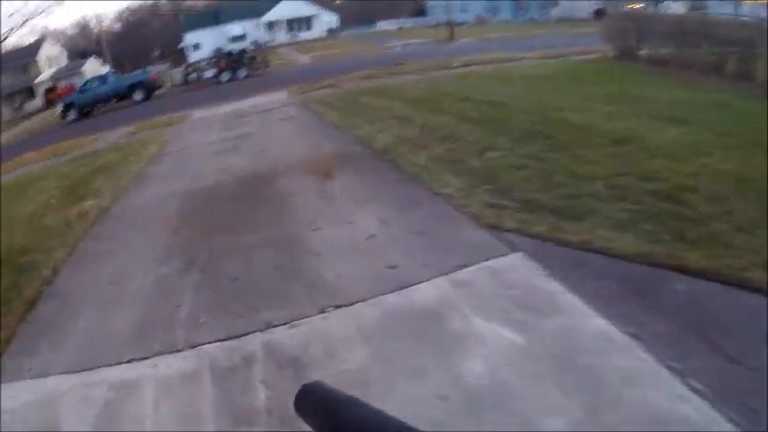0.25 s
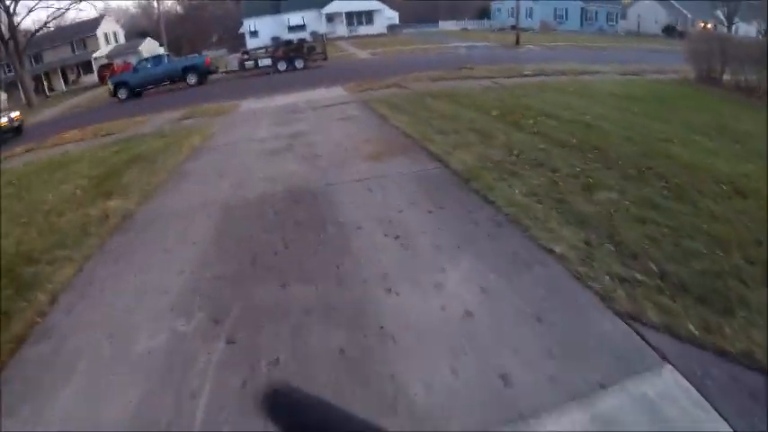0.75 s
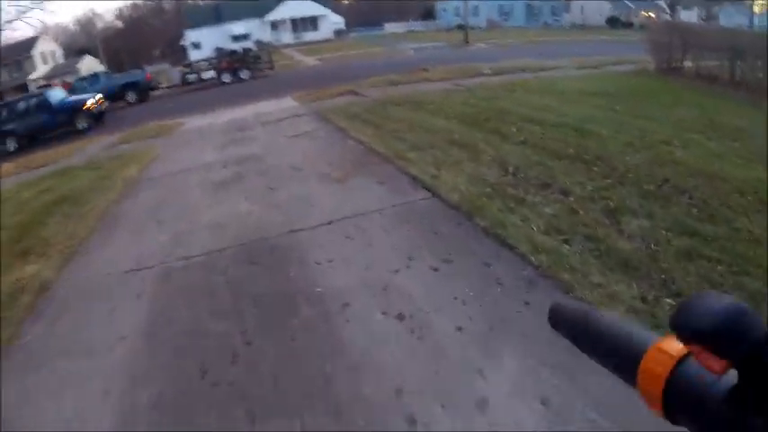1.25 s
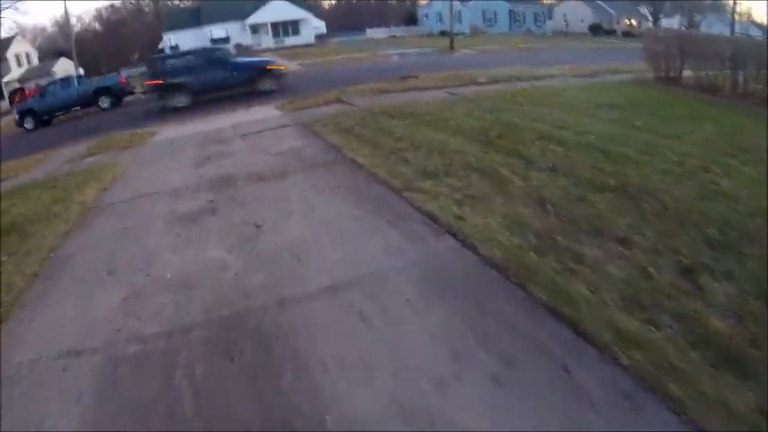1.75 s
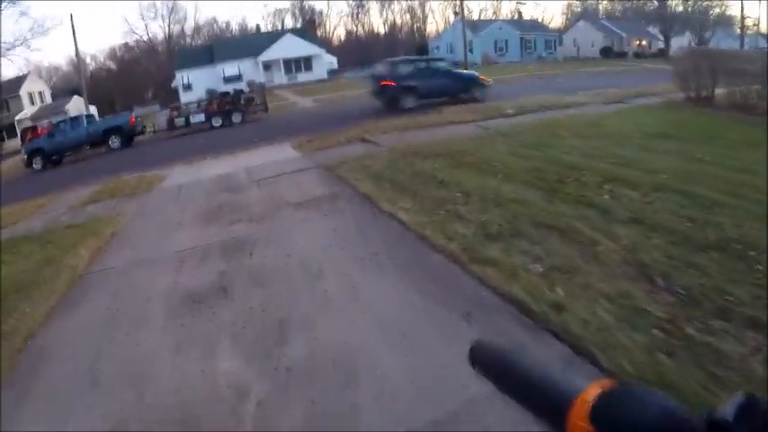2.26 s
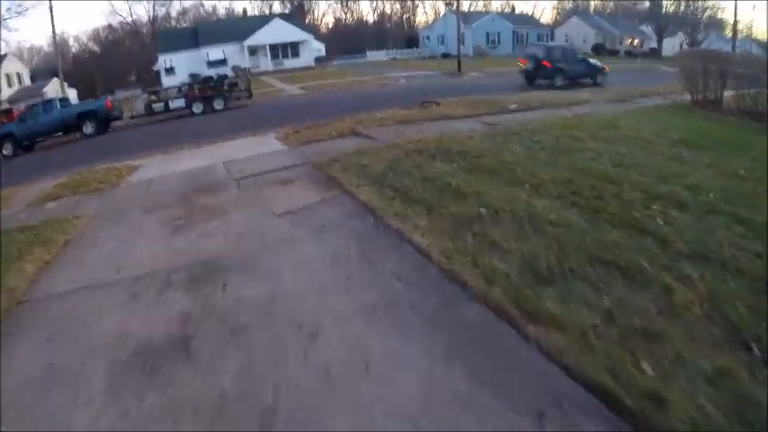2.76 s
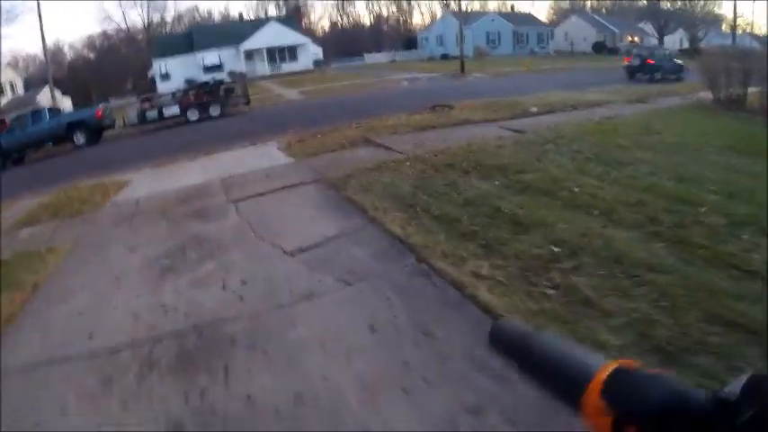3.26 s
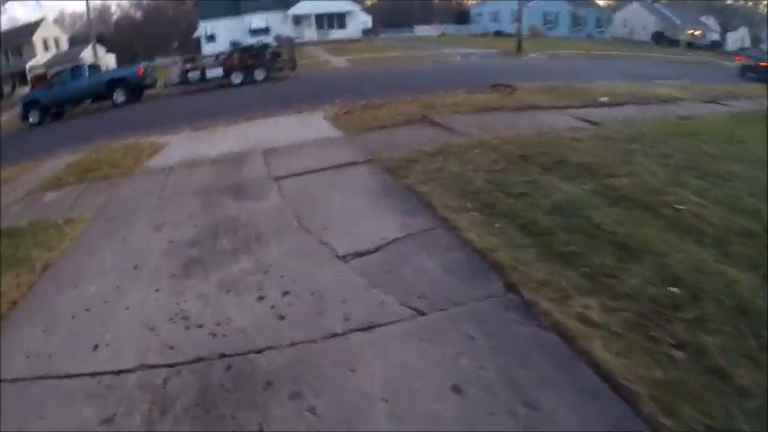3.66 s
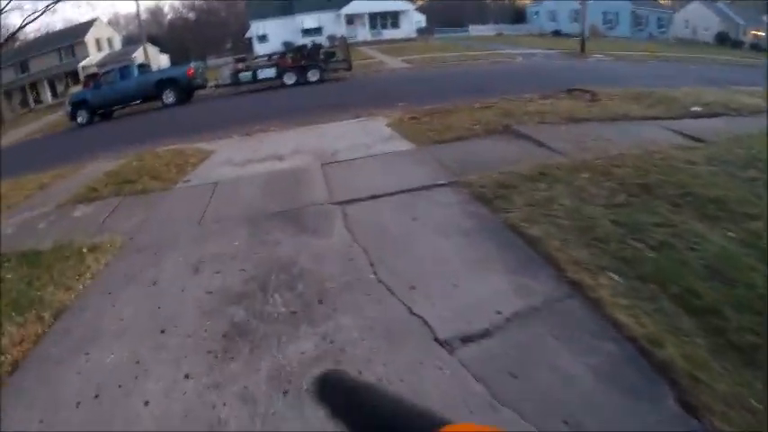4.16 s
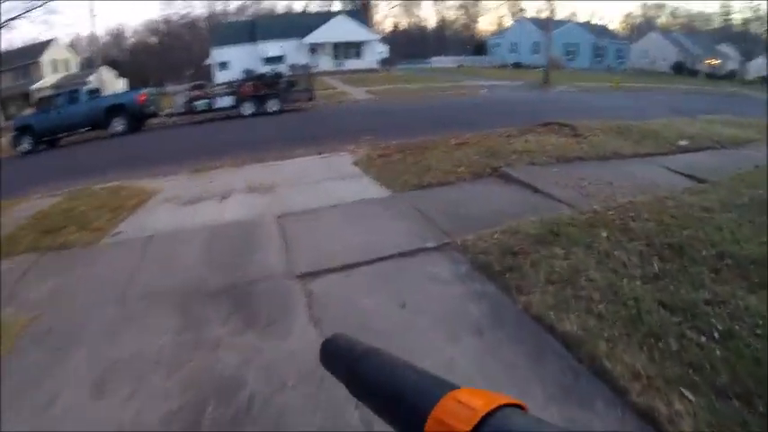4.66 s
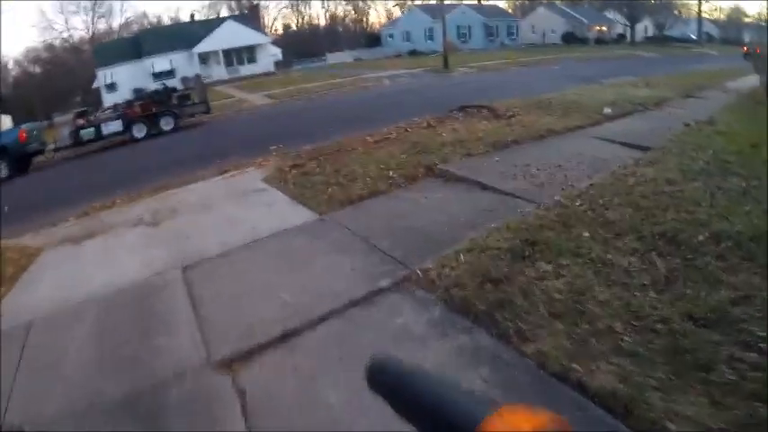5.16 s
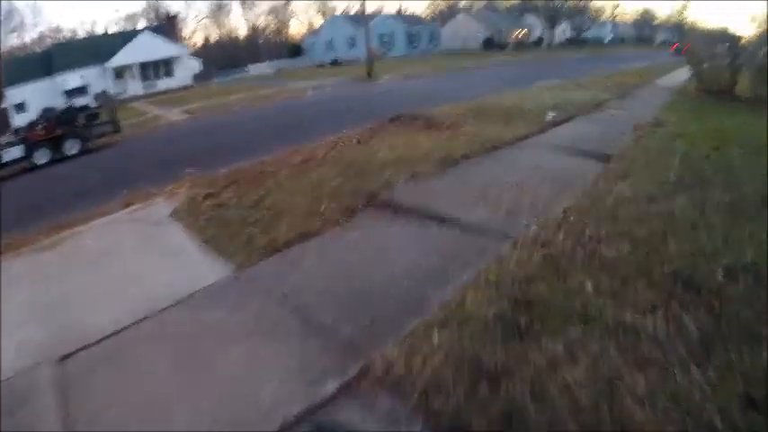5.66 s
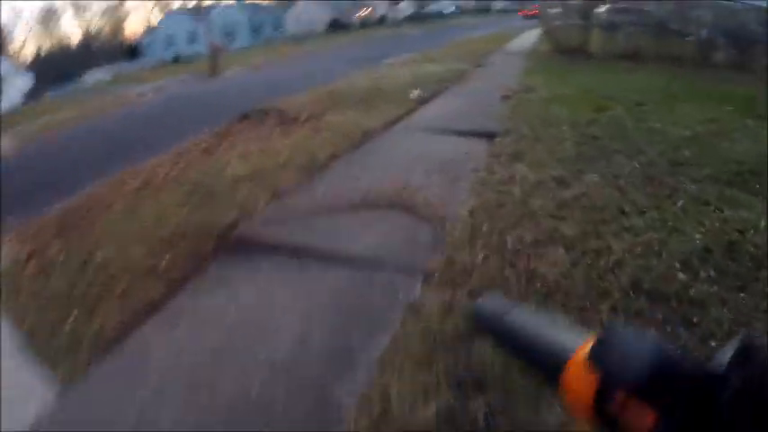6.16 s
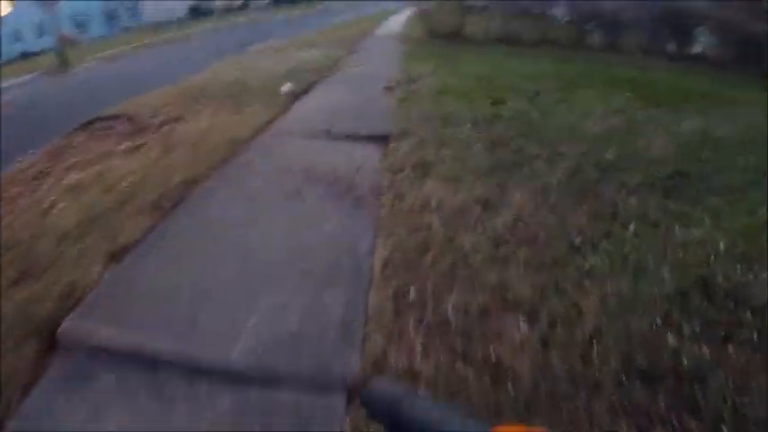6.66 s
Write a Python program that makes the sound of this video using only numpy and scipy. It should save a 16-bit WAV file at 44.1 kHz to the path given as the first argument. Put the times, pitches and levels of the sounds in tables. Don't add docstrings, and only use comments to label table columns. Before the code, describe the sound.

Close, muffled drone of a four-stroke leaf blower with rushing air; near the end the engine sags, sputters dully and revs up again.

```python
import sys
import numpy as np
from scipy import signal
from scipy.io import wavfile
from scipy.ndimage import uniform_filter1d

SR = 44100
rng = np.random.default_rng(int(sys.argv[2]) if len(sys.argv) > 2 else 0)


def how_loud(loudness_db):
    steps = np.asarray(loudness_db, float) / 20
    return 10 ** steps


def bounce(signal):
    frames = np.transpose(np.atleast_2d(signal))
    limited = np.clip(frames, -1, 1)
    pcm = np.round(limited * 32767).astype(np.int16)
    wavfile.write(sys.argv[1], SR, pcm)


N = 304290


def curve(rows):
    s, value = np.transpose(rows)
    return np.interp(np.arange(N) / SR, s, value)


def bumps(rows):
    s, length, *columns = np.transpose(rows)
    t = np.arange(0, N, 64) / SR
    shape = np.exp(-4 * ((t[:, None] - s) / length) ** 2)
    return [np.interp(np.arange(N) / SR, t, shape @ c) for c in columns]


def read(spectrum, hz):
    f, level = np.transpose(spectrum)
    return np.interp(np.log(hz + 1), np.log(f + 1), level)


def smooth(x, first, second):
    return uniform_filter1d(uniform_filter1d(x, size=first), size=second)


def steady(x):
    return x / np.sqrt(abs(smooth(x ** 2, 3000, 3000)) + 1e-20)


def resonate(x, hz, width):
    turn = np.exp(2j * np.pi * np.cumsum(hz * np.ones(N)) / SR)
    r = np.exp(-np.pi * width / SR)
    return 2 * (turn * signal.lfilter([1 - r], [1, -r], x / turn)).real


def clicks(turns, spread_db, jitter_s):
    at = np.flatnonzero(np.diff(np.floor(turns)) > 0)
    chance = rng.standard_normal((len(at), 2))
    late = np.round(jitter_s[at] * chance[:, 0] * SR).astype(int)
    out = np.zeros(N)
    out[np.clip(at + late, 0, N - 1)] = how_loud(spread_db[at] * chance[:, 1])
    return out


def noise(spectrum, patchy_db, flicker_db, size):
    frames, hz = N // 256 + 5, np.fft.rfftfreq(1024, 1 / SR)
    a, b, patches = rng.standard_normal((frames, 513, 3)).T
    patches = uniform_filter1d(uniform_filter1d(patches, size=12, axis=0), size=size, axis=1)
    flicker = uniform_filter1d(rng.standard_normal(frames), size=4)
    field_db = read(spectrum, hz)[:, None] + patchy_db * patches / patches.std()
    field_db = field_db + flicker_db * flicker / flicker.std()
    x = signal.istft((a + 1j * b) * how_loud(field_db), nperseg=1024, noverlap=768)[1][500:N + 500]
    return x / x.std()


# t/s, opening/0-1
THROTTLE = [
    (0, 1),
    (5.15, 1),
    (5.18, .4),
    (5.58, .4),
    (5.66, .94),
    (5.85, 1),
    (6.9, 1),
]


def closed_throttle():
    return 1 - curve(THROTTLE)


# t/s, level/dB
BURN = [(0, 0), (5.15, 0), (5.21, -2.5), (5.3, -4), (5.4, -15), (5.53, -16), (5.59, -7.5), (5.7, 0),
        (5.77, -1.5), (5.86, 0), (6.1, 1), (6.32, 1), (6.44, 0.5), (6.6, 0), (6.9, -0.5)]


def burn():
    return curve(BURN)


# t/s, firing rate/Hz; the crank turns twice a firing
GOVERNED = [(0, 60.65), (1.12, 60.68), (1.36, 60.38), (1.76, 60.8), (2.72, 60.78), (3.15, 61.1),
            (3.52, 60.57), (3.88, 60.88), (4.16, 60.72), (4.32, 60.38), (5.0, 60.4), (5.14, 60.8),
            (6.9, 60.75)]
SHUT_S, IDLE_HZ, SAG_S = 5.162, 30.4, .155
HALF_SPEED_S, CLIMB_PER_S = 5.602, 4.45


def shaft():
    t, full = np.arange(N) / SR, curve(GOVERNED)
    sag = IDLE_HZ + (full - IDLE_HZ) * np.exp(-np.maximum(t - SHUT_S, 0) / SAG_S)
    climb = full / (1 + np.exp(-CLIMB_PER_S * (t - HALF_SPEED_S)))
    return uniform_filter1d(np.maximum(sag, climb), size=1800, mode="nearest")


def slowing(speed):
    pull_lag_s = 0.066
    pull = np.clip(np.gradient(speed) * SR / (speed[0] * CLIMB_PER_S / 4), 0, 1)
    t = np.arange(N) / SR
    pull = uniform_filter1d(np.interp(t - pull_lag_s, t, pull), size=4000)
    return np.log2(speed / speed[0]), pull


# f/Hz, density/dB per Hz
ROAR = [(10, -25), (30, -5.5), (100, -7.5), (200, 2.5), (300, -3.5), (390, 0), (480, -4), (580, -1.5),
        (800, -8), (1000, -16), (1200, -38), (2000, -51), (4000, -100)]
# f/Hz, density/dB per Hz
RUSH = [(530, -35.5), (900, -0.5), (1270, -9.5), (1420, -9.5), (1720, -9.5), (1870, -11.5), (2470, -12),
        (3600, -22.5), (4680, -68), (7920, -120)]
# f/Hz, density/dB per Hz
HISS = [(2000, -27.5), (3400, -22.5), (3750, -1.5), (4430, -7), (4850, -2.5), (5370, -3.5), (6140, -8.5),
        (6940, -7), (8200, -12.5), (10100, -15), (10900, -20.5), (11800, -37), (13500, -29.5),
        (14500, -40.5), (15500, -90)]
# f/Hz, width/Hz, level/dB against the hiss
WHISTLE = (5290, 130, -10)
# t/s, length/s, rush level/dB, hiss level/dB
SWEEPS = [(.4, 0.055, 1.5, 2.5), (1.0, 0.39, -2, 0.5), (1.35, 0.3, 3.5, 2.3), (2.9, 2.2, -1, -.8),
          (3.8, 0.17, -1.5, -2), (4.3, .3, 0, 1.5), (4.9, 0.27, 1.7, .6), (5.19, .12, 1.5, 2.5),
          (5.78, 0.054, 4.5, 2), (5.96, 0.069, 5.5, 2.5), (6.09, 0.1, 5, 4), (6.3, 0.21, 4, 2.5),
          (6.5, 0.5, 2, 4), (6.66, .08, -0.5, 3)]
ROAR_DB, RUSH_DB, HISS_DB = -23.5, -32, -45
ROAR_LAW, RUSH_LAW, HISS_LAW, AIR_LAG_S = 2, 7.2, 10.3, .03


def air(turns, speed):
    octaves, pull = slowing(speed)
    low_db, high_db = bumps(SWEEPS)
    slack = closed_throttle()
    octaves = np.interp(np.arange(N) - AIR_LAG_S * SR, np.arange(N), octaves)
    octaves = uniform_filter1d(octaves, size=5000)
    roar_db = ROAR_DB + ROAR_LAW * octaves + 4.5 * pull + .7 * low_db
    rush_db = RUSH_DB + RUSH_LAW * octaves + low_db
    hiss_db = HISS_DB + HISS_LAW * octaves + high_db + 2.5 * pull

    roar = noise(ROAR, patchy_db=1.3, flicker_db=.4, size=5)
    roar = roar + 1.4 * slack * resonate(roar, 140, 70)
    puff = 1 + 0.072 * np.cos(2 * np.pi * turns - 1.1)
    rush = puff * noise(RUSH, patchy_db=1.5, flicker_db=0.36, size=3)
    rush = rush + 2.0 * slack * resonate(rush, 1180, 350)
    hiss = noise(HISS, patchy_db=1.0, flicker_db=1.04, size=10)
    hz, width, db = WHISTLE
    band = signal.butter(2, [hz - width / 2, hz + width / 2], "band", fs=SR)
    hiss = hiss + how_loud(db) * steady(signal.lfilter(*band, rng.standard_normal(N)))
    return how_loud(roar_db) * roar + how_loud(rush_db) * rush + how_loud(hiss_db) * hiss


PULSE_PHASE, PULSE_LEAD = 2.6, .024
BLADES = 6
SHAKE_DB = -21.5
FRAME_HZ, FRAME_WIDTH_HZ, FRAME_DB = 87, 14, 2.5
# t/s, length/s, level/dB
PRESSES = [
    (.7, 0.35, 4),
    (1.1, .2, -3.5),
    (1.45, 0.28, 1.5),
    (2.1, .2, -3),
    (4.3, 0.31, 2.5),
    (4.95, 0.26, 1.5),
    (6.2, .4, -0.5),
    (6.9, 0.47, 2.5),
]
# f/Hz, level/dB
BLADE_PATH = [(385, -19), (430, -25), (500, -23.5), (560, -21.5), (610, -34), (680, -37), (712, -36.5),
              (730, -33)]
# f/Hz, level/dB
OCTAVE_PATH = [(770, -46), (900, -41), (1030, -35), (1080, -41), (1200, -47), (1450, -48)]
# t/s, length/s, level/dB
WHINES = [
    (.3, .2, 7),
    (1.33, .15, 7.5),
    (3.85, .12, 6),
    (4.28, 0.22, 11),
    (5.27, .1, 8),
]


def rotor(turns, speed):
    burn_db = burn()
    shake_db = SHAKE_DB + bumps(PRESSES)[0] + 0.55 * burn_db + 4.5 * slowing(speed)[1]
    detuning = 2 * (2 * speed - FRAME_HZ) / FRAME_WIDTH_HZ
    shake_db = shake_db + FRAME_DB / (1 + detuning ** 2)
    blade_db = read(BLADE_PATH, 2 * BLADES * speed) + 0.53 * burn_db
    octave_db = read(OCTAVE_PATH, 4 * BLADES * speed) + bumps(WHINES)[0]
    waver = smooth(rng.standard_normal((2, N)), 2500, 1200)
    waver = np.tanh(waver / waver.std()) * speed / speed[0]

    angle = 2 * np.pi * (turns + PULSE_LEAD)
    shake = how_loud(shake_db) * np.cos(2 * angle + PULSE_PHASE)
    valves = -how_loud(0.5 * (shake_db + 19) - 27.5) * np.cos(angle + PULSE_PHASE)
    passing = 2 * BLADES * angle + 1.5 * waver[1]
    blade = how_loud(blade_db + 5.0 * waver[0]) * np.cos(passing)
    octave = how_loud(octave_db + 5.0 * waver[1]) * np.cos(2 * passing + 1.5 * waver[1])
    return np.sqrt(2) * (shake + valves + blade + octave)


# t/s, damping depth/dB, lift of the next swell/dB
STRIDES = [(-.12, 14, 1), (.39, 7, 0.3), (.82, 4, 0.1), (1.31, 5, 0.4), (1.87, 6.5, 1.5), (2.28, 6, .3),
           (2.82, 4.5, 1.5), (3.29, 6, .2), (3.82, 6, 1.2), (4.23, 6.5, -0.1), (4.77, 8, 1.5),
           (5.27, 2, -1), (5.77, -2, 1), (6.32, 4.5, -0.5), (6.65, 6.5, -2), (7.1, 13, .1)]


def damping():
    s, depth_db, lift_db = np.transpose(STRIDES)
    t = np.arange(N) / SR
    stride = np.interp(t, s, np.arange(len(s)))
    arch = abs(np.sin(np.pi * stride)) ** 1.36
    loss_db = np.interp(t, s, depth_db) * (1 - arch) - lift_db[stride.astype(int)] * arch
    return uniform_filter1d(loss_db, size=2000)


# f/Hz, level/dB
EXHAUST = [(95, 6), (125, 3.5), (180, 1.5), (245, 1), (300, -11.5), (365, -22.5), (480, -19), (700, -25)]
THUMP_DB = -13.5


def exhaust(turns, speed, slack, burn_db, damp_db):
    level_db = THUMP_DB + 0.57 * burn_db + 6.5 * slowing(speed)[0] + 0.21 * damp_db - 11 * slack
    level_db = level_db + bumps([(6.42, 0.39, 2)])[0]
    uneven = smooth(rng.standard_normal((2, N)), 500, 300)
    uneven = uneven / uneven.std()
    angle = 2 * np.pi * (turns + PULSE_LEAD + (.002 + .02 * slack) * uneven[0])
    smear = 1.7 * (1 - speed / speed[0])
    thump = np.zeros(N)
    for k in range(3, 12):
        order_db = read(EXHAUST, k * speed) - 8 * slack * np.log2(k)
        thump += how_loud(order_db) * np.cos(k * angle + PULSE_PHASE - smear * (k - 2) ** 2)
    return how_loud(level_db) * steady(thump) * how_loud(3.0 * slack * uneven[1])


# t/s, frequency factor
TUNING = [(0, 1.0), (5.15, 1.0), (5.27, 1.05), (5.68, 1.05), (5.92, 1.01), (6.2, 1.03), (6.35, .99),
          (6.9, 1)]
# f/Hz, width/Hz
HOUSING = (553.6, 29)
RING_DB = -12


def housing(knocks, tuning, burn_db, damp_db):
    hz, width = HOUSING
    level_db = RING_DB + 2.05 * burn_db - damp_db
    ring = resonate(resonate(knocks, hz * tuning, width), hz, 73)
    return how_loud(level_db - 4.5) * steady(ring)


# f/Hz, width/Hz, level/dB
INTAKE = [(409, 44.3, -3.5), (605.7, 14, -2.5), (666.5, 17.6, 2), (788.7, 16, -5.5), (909.4, 30, -16.5),
          (1396, 42, -20.5), (1668, 50, -22.5)]
BUZZ_DB = -20.5


def intake(knocks, tuning, burn_db, damp_db, pull):
    level_db = BUZZ_DB + 1.5 * burn_db + 0.045 * damp_db + 0.5 * pull
    drift = smooth(rng.standard_normal((len(INTAKE), N)), 6000, 3000)
    drift = drift / drift.std()
    loudest_hz = max(INTAKE, key=lambda mode: mode[2])[0]
    buzz = np.zeros(N)
    for (hz, width, db), wander in zip(INTAKE, drift):
        mode_db = db + 1.6 * wander
        if hz != loudest_hz:
            mode_db = mode_db - 4.5 * pull
        buzz += how_loud(mode_db) * resonate(resonate(knocks, hz * tuning, width), hz, 100)
    return how_loud(level_db + 0.76) * steady(buzz)


def engine(turns, speed):
    slack, tuning = closed_throttle(), curve(TUNING)
    burn_db, damp_db = burn(), damping()
    knocks = -clicks(turns, .3 + 3.0 * slack, 1.5e-5 + 6e-4 * slack)
    knocks = signal.oaconvolve(knocks, np.hanning(15), "same")
    thump = exhaust(turns, speed, slack, burn_db, damp_db)
    ring = housing(knocks, tuning, burn_db, damp_db)
    buzz = intake(knocks, tuning, burn_db, damp_db, slowing(speed)[1])
    return thump + ring + buzz


def scene():
    speed = shaft()
    turns = np.cumsum(speed) / SR + .98
    return (air(turns, speed) + rotor(turns, speed) + engine(turns, speed))[None]


def band_limit(x):
    return signal.sosfilt(signal.butter(12, 14966, fs=SR, output="sos"), x)


def record(dry):
    limit = .975
    soft = dry / (1 + abs(dry / limit) ** 8) ** (1 / 8)
    return band_limit(soft)


dry = scene()
out = record(dry)
bounce(out)
```